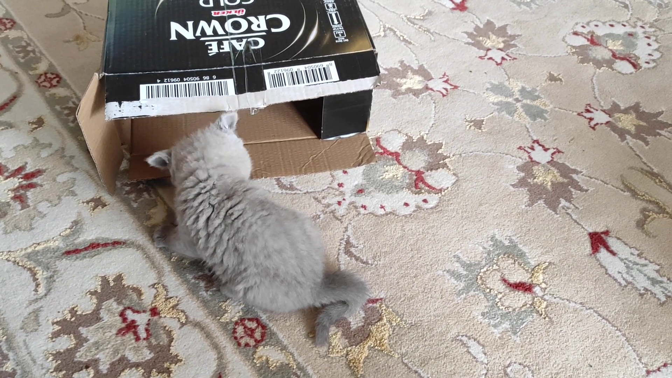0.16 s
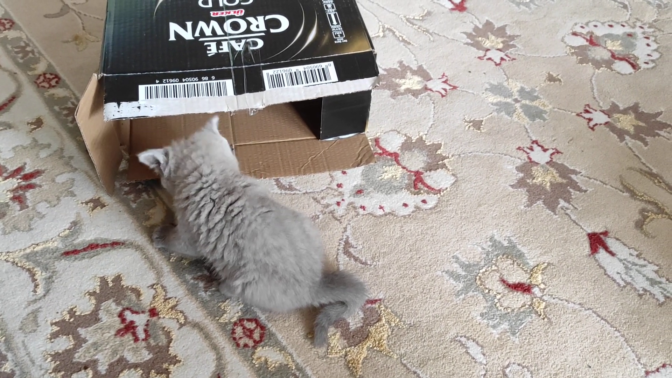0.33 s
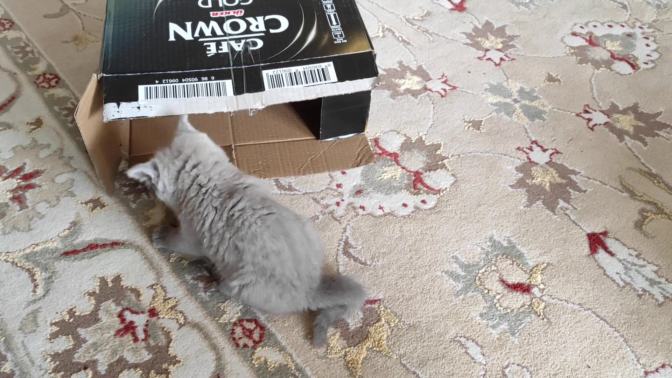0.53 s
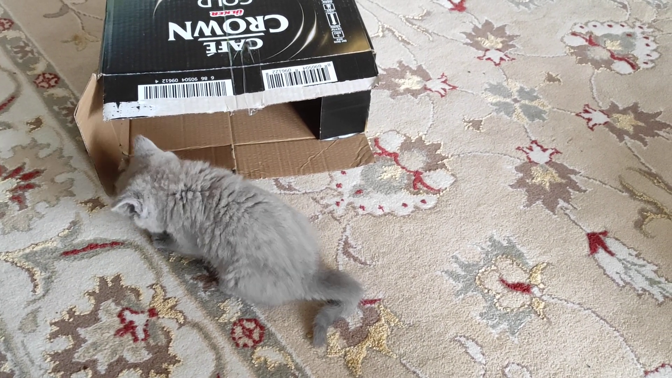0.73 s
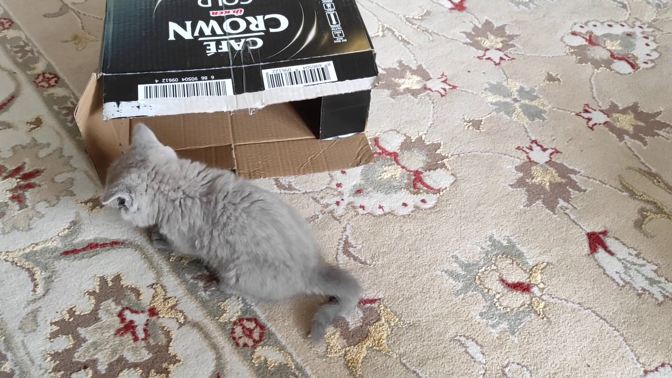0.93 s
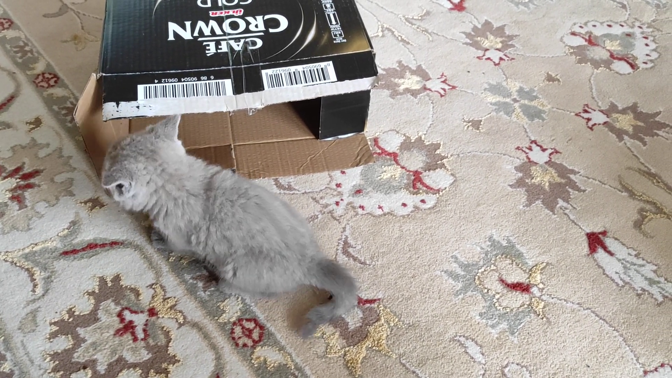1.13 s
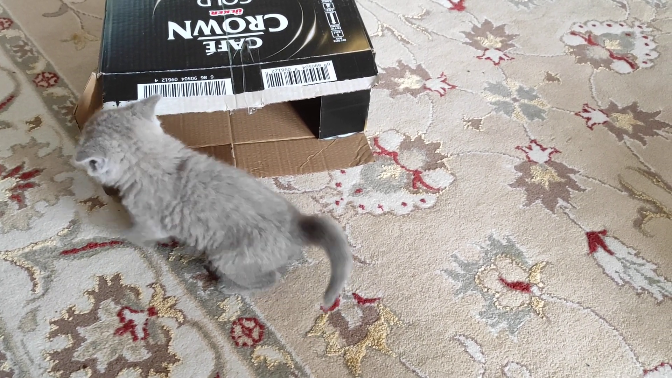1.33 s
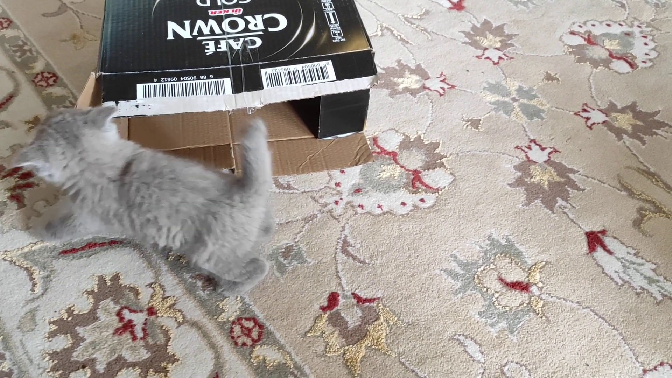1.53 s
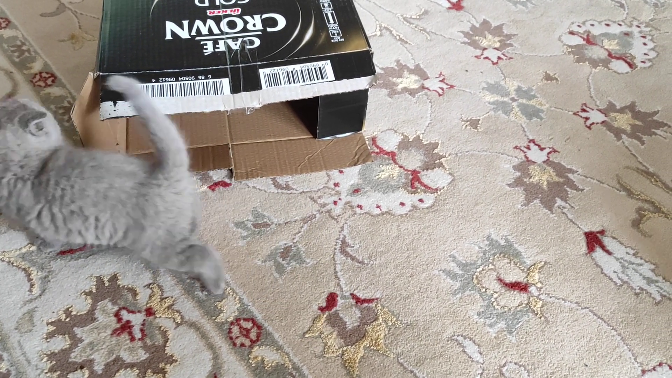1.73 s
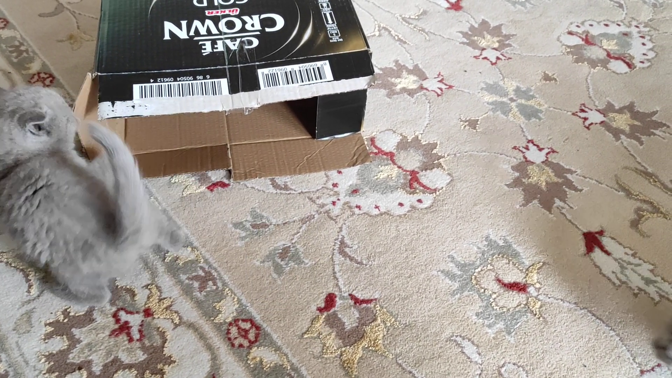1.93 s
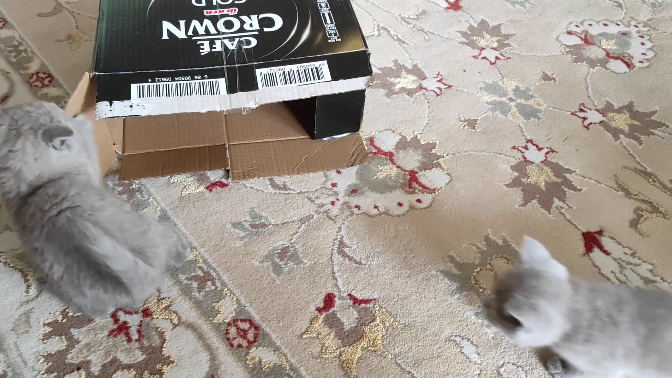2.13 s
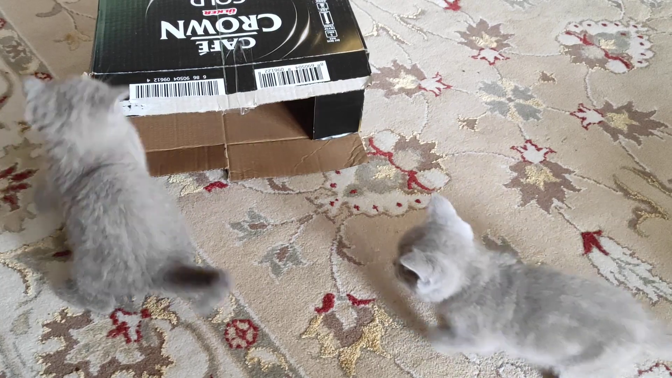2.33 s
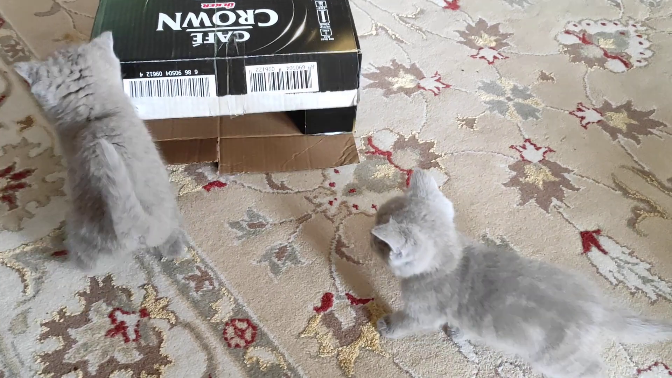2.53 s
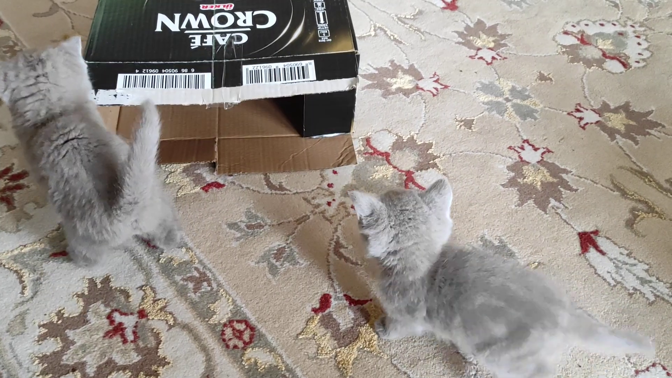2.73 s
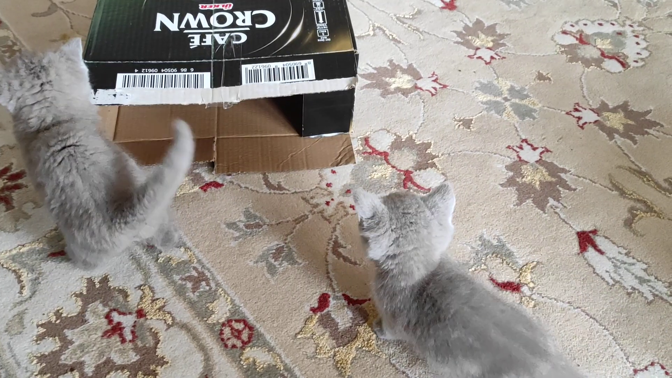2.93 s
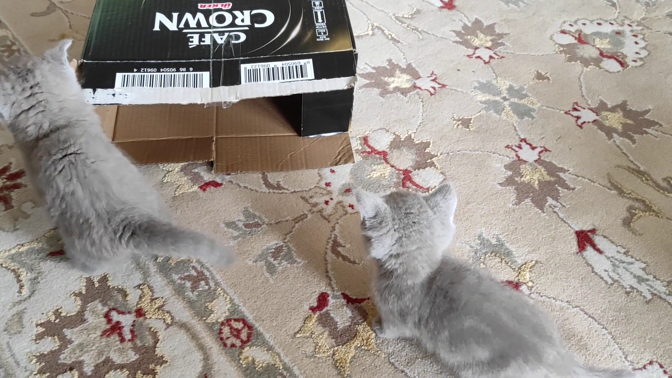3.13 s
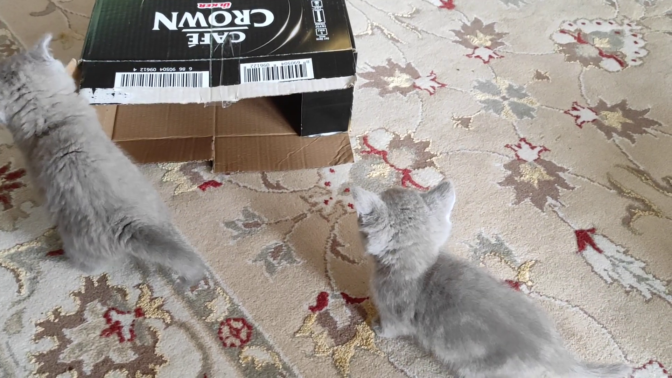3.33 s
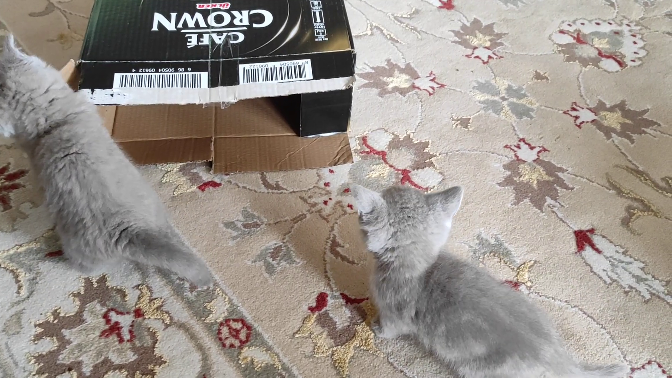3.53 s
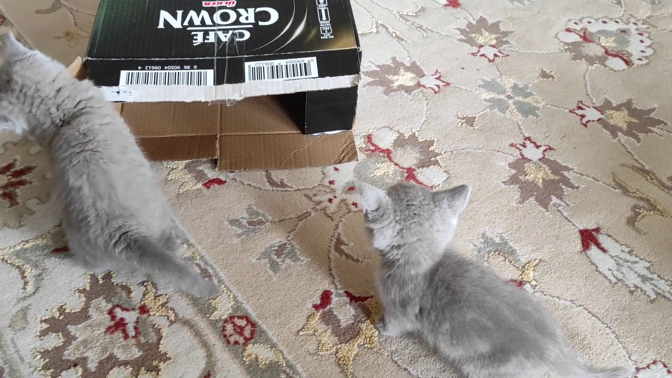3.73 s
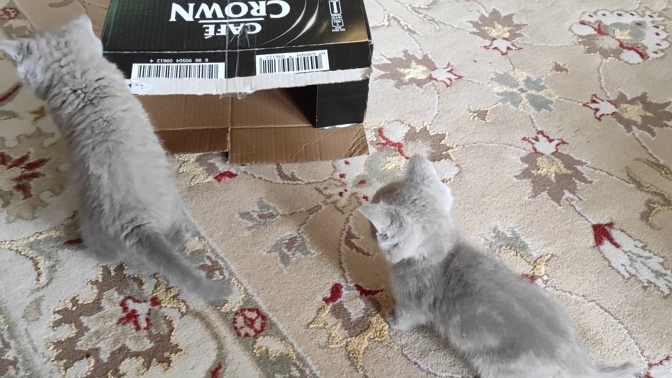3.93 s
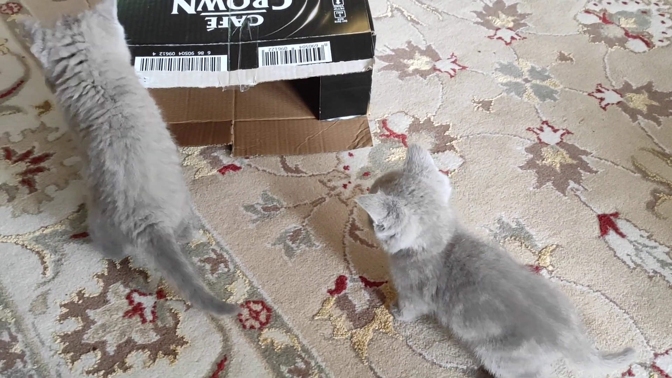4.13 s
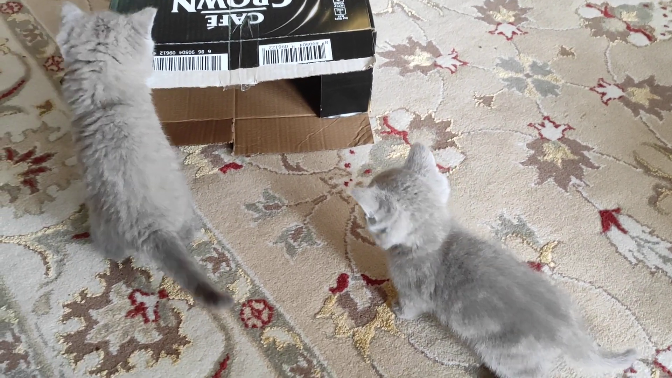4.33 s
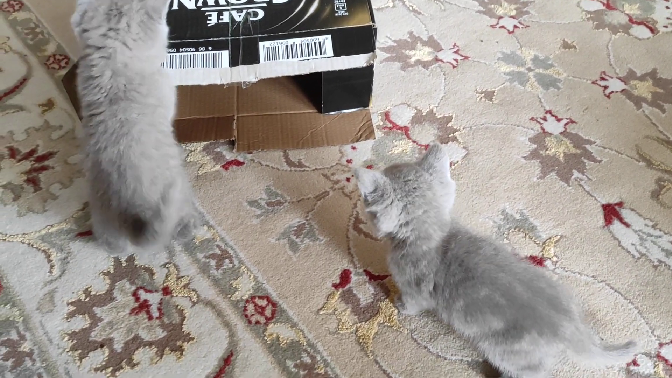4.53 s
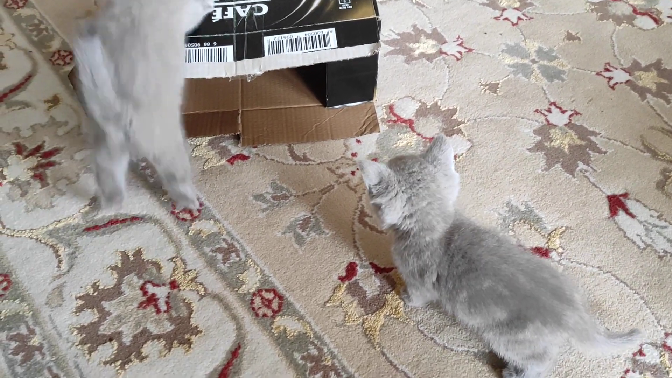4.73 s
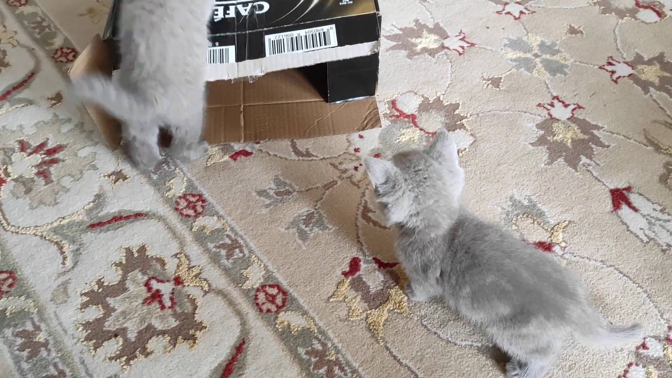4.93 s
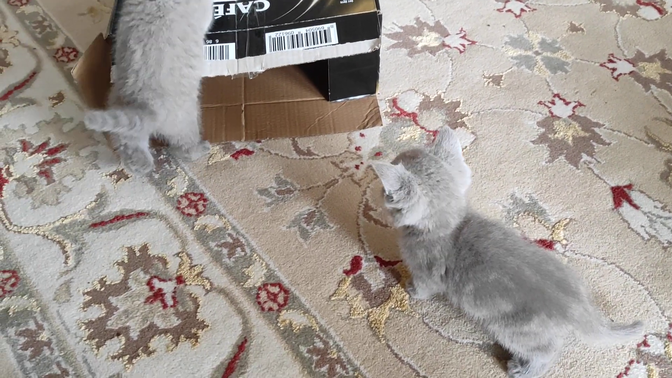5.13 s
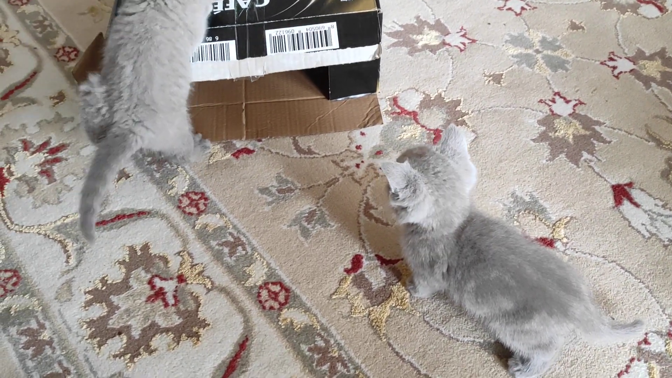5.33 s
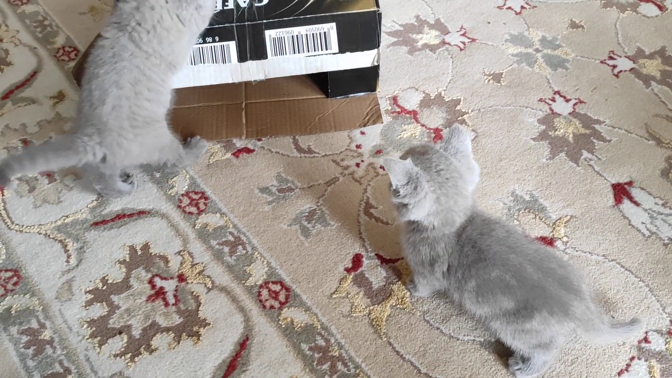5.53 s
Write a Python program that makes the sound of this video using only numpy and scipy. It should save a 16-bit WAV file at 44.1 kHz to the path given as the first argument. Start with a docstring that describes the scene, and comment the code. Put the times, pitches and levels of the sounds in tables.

```python
"""Kittens paw, claw and rub at an open cardboard box on a carpet in a quiet living room.
Paws thump the walls and rap the board (ringing modes); claw tips tap it (short swelling sines).
Claws, fur and flaps rub and rasp (stick-slip clicks); a soft room answers, low rumble and hiss lie below.
A hand-held recorder hears the box first at its right port, louder at its left for most pitches."""
import sys
import numpy as np
from scipy import signal
from scipy.fft import rfft, irfft, next_fast_len
from scipy.io import wavfile

SR = 44100
rng = np.random.default_rng(int(sys.argv[2]) if len(sys.argv) > 2 else 0)


def materialize(psi):
    """Save the field psi as 16-bit PCM at rate SR to the path in sys.argv[1].

    A 1-D psi becomes a single channel; in a 2-D psi each row is a channel.
    """
    bounded = np.clip(np.atleast_2d(psi).T, -1, 1)
    quanta = np.round(bounded * 32767).astype(np.int16)
    wavfile.write(sys.argv[1], SR, quanta)


N = 245637
FAST = next_fast_len(N)

# paw contacts: start_s, claw_scratch_db, board_rap_db, wall_thump_db, contact_s,
# board_spot_hz, pushed_wall_hz
PAW_CONTACTS = [(0.487, -66, -53, -85, 0.035, 1740, 297), (0.647, -68, -66, -74, 0.065, 704, 303),
                (0.852, -59, -86, -83, 0.0011, 1800, 250), (0.902, -64, -60, -73, 0.058, 516, 407),
                (1.194, -59, -73, -87, 0.0016, 2770, 160), (1.925, -60, -74, -55.5, 0.03, 850, 234),
                (2.103, -43.5, -49.5, -43.5, 0.011, 1070, 215), (2.152, -56, -68, -58, 0.017, 920, 171),
                (2.187, -55, -52, -59, 0.0025, 656, 230), (2.222, -40, -42, -38, 0.022, 840, 187),
                (2.431, -58, -39.5, -30, 0.018, 1010, 244), (2.452, -45.5, -44.5, -28.5, 0.018, 610, 156),
                (2.48, -35, -73, -28.5, 0.0031, 600, 210), (2.497, -45, -43, -33, 0.021, 740, 276),
                (2.659, -47.5, -49.5, -45.5, 0.043, 855, 73),
                (2.696, -41.5, -47.5, -41.5, 0.011, 1090, 197), (2.75, -58.5, -55, -40.5, 0.026, 640, 156),
                (2.8, -44, -76, -78, 0.0053, 1480, 250), (2.865, -62.5, -46.5, -62, 0.024, 600, 343),
                (3.005, -57.5, -44.5, -56.5, 0.042, 620, 338), (3.35, -64, -59.5, -64, 0.0028, 810, 220),
                (3.404, -70, -71, -68, 0.013, 1070, 264), (3.561, -56, -48.5, -45.5, 0.02, 1840, 355),
                (3.584, -47, -44, -45, 0.024, 710, 198), (4.003, -50, -47.5, -55, 0.05, 664, 412),
                (4.019, -51.5, -42.5, -40.5, .012, 1330, 215), (4.312, -46.5, -50.5, -51, 0.032, 1740, 192),
                (4.382, -35, -36.5, -40.5, 0.028, 1540, 235), (4.694, -55.5, -48, -61, 0.016, 920, 378),
                (4.81, -37.5, -50, -27.5, 0.008, 530, 262), (4.829, -34, -47, -27, 0.017, 1150, 251),
                (4.971, -50, -43, -32, 0.019, 940, 164), (5.55, -66, -42, -52, 0.0064, 457, 400)]


def from_db(db):
    """Decibels to gain."""
    return 10 ** (np.asarray(db) / 20)


def rms_one(x):
    """Scale to unit rms."""
    return x / np.sqrt(np.mean(x ** 2) + 1e-20)


def at_hz(points, hz):
    """Read a (Hz, value) table on a log-frequency axis."""
    table_hz, values = np.array(points).T
    return np.interp(np.log(np.maximum(hz, 1)), np.log(np.maximum(table_hz, 1)), values)


def colour(x, spectrum):
    """Causal minimum-phase filter that follows a dB spectrum, by way of the folded cepstrum."""
    size = next_fast_len(N + 8192)
    gain = from_db(at_hz(spectrum, np.fft.rfftfreq(size, 1 / SR)))
    cepstrum = irfft(np.log(gain), size)
    cepstrum[1:size // 2] *= 2
    cepstrum[size // 2 + 1:] = 0
    return irfft(rfft(x, size) * np.exp(rfft(cepstrum)), size)[..., :N]


def drift(rate_hz):
    """Slow random wander of unit rms: noise through two equal one-pole low-passes."""
    settle = 9000   # samples dropped
    pole = np.exp(-2 * np.pi * rate_hz / SR)
    noise = rng.standard_normal(N + settle)
    return rms_one(signal.lfilter([1], [1, -2 * pole, pole * pole], noise)[settle:])


def grains(per_s, spread_db):
    """Random stick-slip clicks of uneven size and either sign; rms 1."""
    size_db = spread_db * np.minimum(rng.exponential(1, N), 4)
    sizes = from_db(size_db) * rng.choice([-1, 1], N)
    return rms_one(sizes * (rng.random(N) < per_s / SR))


def ring(force, hz, t60_s):
    """One damped mode; steady unit noise comes out with rms near 1."""
    r = from_db(-60 / (t60_s * SR))
    w = 2 * np.pi * hz / SR
    drive = np.sin(w) * np.sqrt(2 * (1 - r * r))
    return signal.lfilter([0, drive], [1, -2 * r * np.cos(w), r * r], force + 1e-18)


def hush():
    """Low rumble of the house and fine hiss: shaped noise, mostly unlike on the two sides."""
    # background spectrum: pitch_hz, relative_level_db_per_hz
    hush_spectrum = [(14, 1.5), (25, -15.5), (45, -9), (80, -15), (180, -17.5), (320, -22), (520, -25.5),
                     (900, -30.5), (1600, -34.5), (3500, -41.5), (7500, -41), (9000, -41), (10000, -52.5),
                     (12500, -47.5), (13500, -83.5)]
    level_db, likeness = -62.5, 0.088   # likeness: left-right correlation
    common, apart = rfft(rng.standard_normal((2, FAST)))
    sides = np.array([[1], [-1]])
    spectra = np.sqrt(1 + likeness) * common + np.sqrt(1 - likeness) * apart * sides
    pair = irfft(spectra, FAST)[:, :N]
    return from_db(level_db) * rms_one(colour(pair, hush_spectrum)) * from_db(2.2 * sides)


def room(x):
    """Ten feedback delays a side, duller on every round; long waves reach both ports alike."""
    t60_s, wall_cut_hz = 0.26, 18700
    shared_below_hz, bass_loss_hz = 70, 246
    size = next_fast_len(N + SR)
    hz = np.fft.rfftfreq(size, 1 / SR)
    dull = 1 / (1 + 1j * hz / wall_cut_hz)
    sides = []
    for lags_s in np.geomspace(.0043, .037, 20).reshape(10, 2).T:
        response = 0
        for k, lag_s in enumerate(lags_s):
            delay = np.exp(-2j * np.pi * hz * round(lag_s * SR) / SR)
            loop = from_db(-60 * lag_s / t60_s) * dull * delay
            response = response + (-1) ** k * loop / (1 - loop)
        sides.append(response)
    shared = 1 / (1 + 1j * hz / shared_below_hz)
    sides[1] = shared * sides[0] + (1 - shared) * sides[1]
    bass_cut = 1j * hz / (bass_loss_hz + 1j * hz)   # the echo is thin below about 250 Hz
    return irfft(rfft(x, size) * bass_cut * np.array(sides), size)[:, :N]


def ports(pair):
    """The left port hears a little later, and the recorder's body shades each port by pitch."""
    # port balance: pitch_hz, left_over_right_db
    port_balance = [(60, 5.5), (380, 5.5), (1500, 5), (2800, 1), (4200, 1), (5200, -7), (6600, -8),
                    (7600, 6), (9500, 7), (12000, 0)]
    left_lag_s = 0.0002
    hz = np.fft.rfftfreq(FAST, 1 / SR)
    half = from_db(at_hz(port_balance, hz) / 2)
    left = half * np.exp(-2j * np.pi * hz * left_lag_s)
    return irfft(rfft(pair, FAST) * np.array([left, 1 / half]), FAST)[:, :N]


def sliding(column):
    """Stroke pressure: each presses down, holds, eases off; a kitten's faint wavering lean lies under."""
    # strokes of fur, claws and flaps: start_s, length_s, box_push_db, board_rub_db, fine_rasp_db
    stroke_table = [(1.907, 0.15, -67.5, -69, -72.5), (2.021, 0.05, -67, -71, -75),
                    (2.118, 0.26, -50.5, -59.5, -57.5), (2.478, 0.21, -43.5, -46, -45.5),
                    (2.62, 0.044, -54, -47, -54.5), (2.655, 0.25, -52, -64.5, -63.5),
                    (2.868, 0.085, -57, -57.5, -61.5), (2.959, 0.067, -63, -67.5, -68),
                    (2.975, 0.33, -67, -74, -67), (3.268, 0.054, -81, -101, -77.5),
                    (3.385, 0.077, -67, -67, -80), (3.603, 0.078, -71, -84, -66),
                    (3.694, 0.055, -83, -75, -70.5), (3.752, 0.024, -71, -76, -71.5),
                    (4.038, 0.15, -71, -68.5, -94), (4.202, 0.18, -75, -71.5, -70.5),
                    (4.323, 0.096, -67, -72, -70.5), (4.679, 0.042, -61, -82, -57.5),
                    (4.809, 0.091, -70, -65, -54), (4.921, 0.2, -44.5, -71.5, -58.5),
                    (5.172, 0.78, -67.5, -63, -56.5)]
    rise_share, fall_share = 0.28, 0.52   # of a stroke's length
    lean_s = (3.2, 3.45, 5.3)   # starts, full, ends
    lean_db = {2: -65, 3: -77.5, 4: -80.5}[column]
    lean_swing_db = 2   # rms
    t = np.arange(N) / SR
    lean = np.interp(t, lean_s, [0, 1, 1], right=0)
    out = from_db(lean_db + lean_swing_db * drift(1.32)) * lean
    for row in stroke_table:
        along = (t - row[0]) / max(row[1], .01)
        press = np.minimum(along / rise_share, (1 - along) / fall_share)
        out += from_db(row[column]) * np.clip(press, 0, 1) ** 2
    return out


def contacts(column, rise, stretch, gains=1, lead_s=0):
    """Contact pressure of every paw: rise and let-go both scale with the contact length."""
    out = np.zeros(N)
    for row, gain in zip(PAW_CONTACTS, gains * np.ones(len(PAW_CONTACTS))):
        length_s = max(row[4], .001)
        start = round((row[0] - min(lead_s, length_s / 4)) * SR)
        count = min(N - start, int(9 * stretch * length_s * SR))
        t = np.arange(count) / SR / length_s   # in contact lengths
        pressure = (1 - np.exp(-t / rise)) * np.exp(-t / stretch)
        out[start:start + count] += gain * from_db(row[column]) * pressure
    return out


def rasp(apart=0.84, patchy_db=1.5):
    """Claws and fur on paper fibres: fine slips that clump band by band, the two sides unlike."""
    # rasp spectrum: pitch_hz, relative_level_db_per_hz
    rasp_spectrum = [(880, -5.5), (1500, 4.5), (2800, -0.5), (4780, -1.5), (6360, 2.5), (8290, 6),
                     (9240, -0.5), (10900, -18.5), (12400, -9), (15700, -18.5)]
    # claws touch up to 3 ms before the pad lands
    pressure = contacts(1, rise=.25, stretch=0.52, lead_s=.003) + sliding(column=4)
    centre, edge = grains(5000, spread_db=2.0), grains(5000, spread_db=-1.5)
    slips = np.array([centre + apart * edge, centre - apart * edge])
    catches = drift(86)   # shared by all bands
    edges_hz = [800, 2500, 4000, 5500, 7000, 9000, 18000]
    patchy = 0
    for k, pair in enumerate(zip(edges_hz, edges_hz[1:])):
        band = signal.butter(2, pair, "band", fs=SR, output="sos")
        clumps = from_db(patchy_db * (catches + drift(68.0)))
        patchy = patchy + (-1) ** k * clumps * signal.sosfilt(band, slips)
    power = from_db(at_hz(rasp_spectrum, np.linspace(0, SR / 2, 2000))) ** 2
    return colour(patchy * pressure, rasp_spectrum) / np.sqrt(np.mean(power))


def taps():
    """Claw-tip ticks: each sets the small patch of board under the claw ringing for a few cycles."""
    # taps: start_s, height_db, board_spot_hz
    tap_table = [(0.479, -49, 1610), (0.489, -41.5, 1780), (0.649, -60.5, 664), (1.196, -55, 2670),
                 (2.101, -43.5, 2620), (2.221, -37.5, 1320), (3.008, -54.5, 810), (4.018, -47, 1160),
                 (4.383, -26, 2440), (4.69, -43, 1590)]
    swell_cycles = 1.7   # to the peak; then it dies away
    out = np.zeros(N)
    for start_s, height_db, spot_hz in tap_table:
        cycles = np.arange(int(9 * swell_cycles * SR / spot_hz)) * spot_hz / SR
        swell = cycles / swell_cycles * np.exp(1 - cycles / swell_cycles)
        start = round(start_s * SR)
        out[start:start + len(cycles)] += from_db(height_db) * swell * np.sin(2 * np.pi * cycles)
    return out


def body(modes, paw_column, pitch_column, slide, rise, stretch, fall_db, per_s, spread_db, kick):
    """A landing kicks, and slips under the paw shake, modes near the touched spot most; slides shake all."""
    slips = [grains(per_s, spread_db) for _ in range(3)]
    hz, db, t60_s = np.transpose(modes)
    octaves = np.log2(hz[:, None] / np.array(PAW_CONTACTS)[:, pitch_column])
    # far modes still answer faintly
    touched = from_db(np.maximum(-fall_db * octaves ** 2, db[:, None] - 18.5))
    touched /= np.sqrt(np.sum(touched ** 2, axis=0))
    rubbed = from_db(db) / np.sqrt(np.sum(from_db(db) ** 2))
    out = np.zeros(N)
    for k in range(len(modes)):
        paws = contacts(paw_column, rise, stretch, touched[k])
        # one push while the pressure builds
        landing = kick * (-1) ** k * np.maximum(np.diff(paws, prepend=0), 0)
        rubbing = slips[k % 3] * (paws + rubbed[k] * slide)
        out += ring(landing + rubbing, hz[k], t60_s[k])
    return out


def board():
    """Corrugated board: short modes rapped by paws and rubbed by strokes."""
    # board modes: pitch_hz, relative_level_db, t60_s
    board_modes = [(458, -4.5, 0.071), (596, 7, 0.026), (642, -22.5, 0.0081), (843, 5.5, 0.016),
                   (1063, 11, 0.015), (1250, 3, 0.0045), (1645, 4.5, 0.014), (1934, 7, 0.014),
                   (2293, 2, 0.018), (2540, -11.5, 0.045)]
    return body(board_modes, 2, 5, sliding(column=3), rise=0.023, stretch=0.72,
                fall_db=28, per_s=1500, spread_db=5.0, kick=14.6)


def walls():
    """Box walls and the air inside: low modes thumped by paws and pushed by strokes."""
    # wall modes: pitch_hz, relative_level_db, t60_s
    wall_modes = [(45.2, -2, 0.16), (59.2, -5.5, 0.28), (77.5, 1, 0.26), (105.6, -20, 0.24),
                  (160.9, -4.5, 0.46), (195, 4.5, 0.13), (254, 1.5, 0.082), (289.9, -3.5, 0.15),
                  (350, 2.5, 0.065), (371, -1.5, 0.096)]
    return body(wall_modes, 3, 6, sliding(column=2), rise=0.13, stretch=0.82,
                fall_db=14, per_s=2300, spread_db=3.5, kick=22.6)


def scene():
    """Walls, board, taps and rasp reach the ports directly and by way of the room, over the hush."""
    board_db, room_db = 1.5, -17.5
    box = walls() + from_db(board_db) * board() + taps() + rasp()
    echo = from_db(room_db) * room(box.mean(axis=0))
    return ports(box + echo) + hush()


def record(dry):
    """Steep low-pass: the top is cut."""
    cutoff_hz = 16500
    return signal.sosfilt(signal.cheby2(12, 70, cutoff_hz, fs=SR, output="sos"), dry)


dry = scene()
out = record(dry)
materialize(out)
```